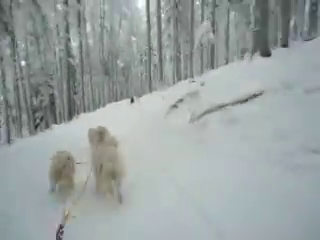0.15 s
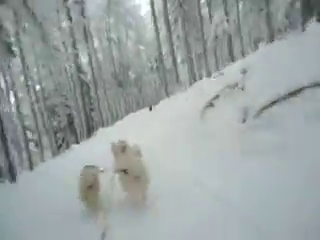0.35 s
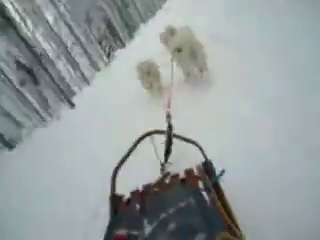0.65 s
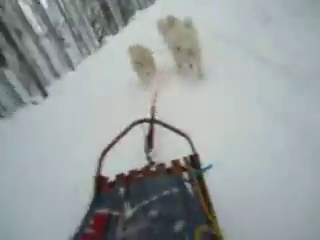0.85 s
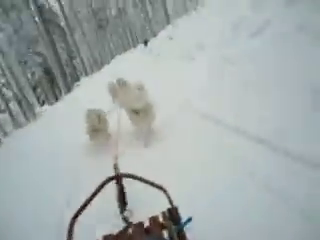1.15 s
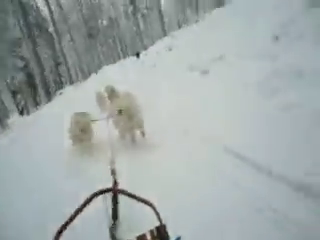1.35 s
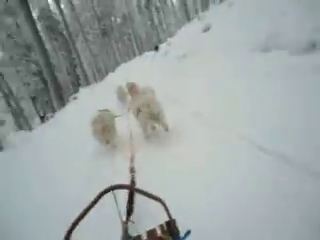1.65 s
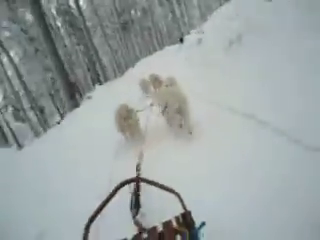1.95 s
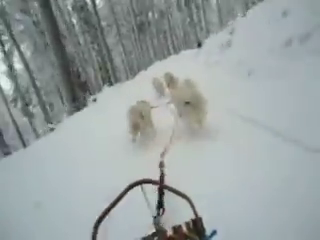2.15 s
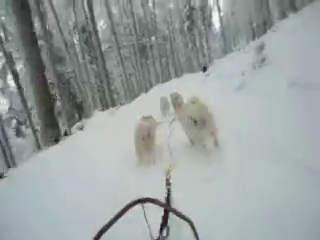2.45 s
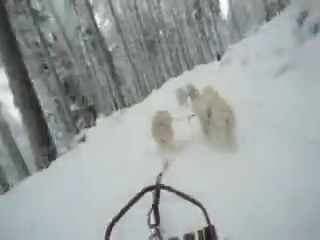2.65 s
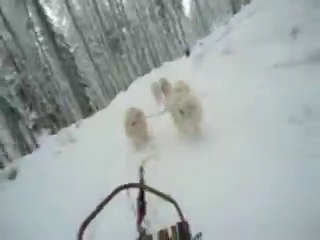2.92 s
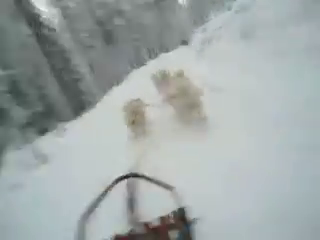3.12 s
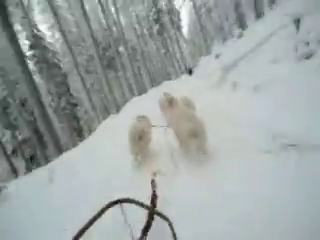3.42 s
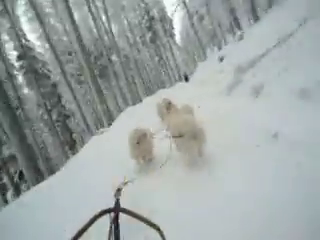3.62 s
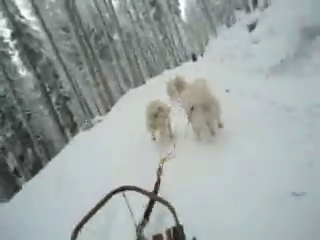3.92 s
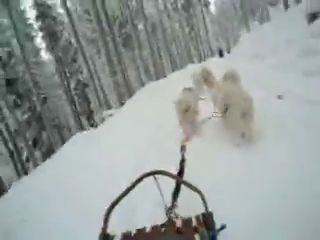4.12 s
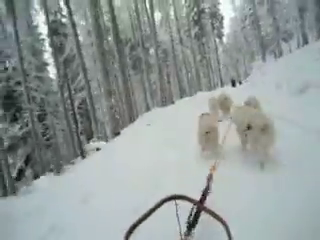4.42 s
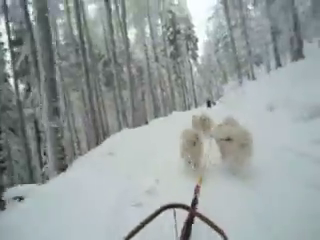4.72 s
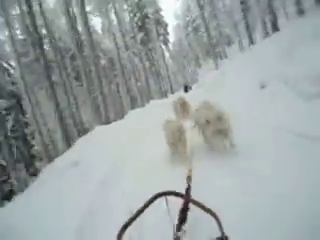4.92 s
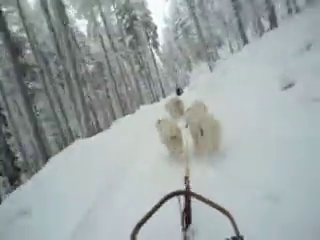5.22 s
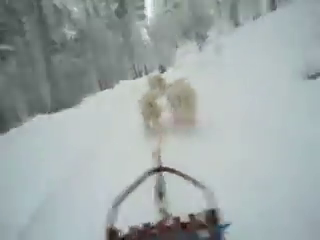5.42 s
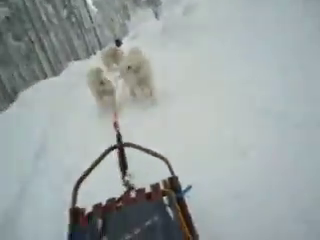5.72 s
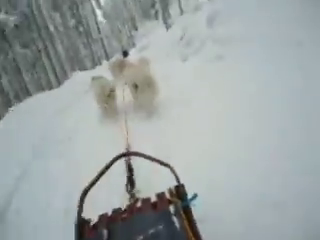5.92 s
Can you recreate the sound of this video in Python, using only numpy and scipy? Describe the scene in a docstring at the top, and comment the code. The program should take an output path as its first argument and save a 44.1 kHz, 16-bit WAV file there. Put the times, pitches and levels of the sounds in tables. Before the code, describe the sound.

Close, overloaded outdoor wind noise dominates, low and rumbling but rough with distortion. It starts choppy, surges heavily from about two seconds, breaks into pops and gaps through the middle, then roars again near five seconds before easing. Bright sliding snow hiss shows through the gaps, with a handful of quick wooden knocks from the sled. The sound is dry, narrow and mono.

```python
"""A harsh, fluttering wind roar, cut by pops and moments of silence, on a dog sled running fast in a snowy forest.
Wind eddies (shaped noise) overload the sled's microphone; long shoves of air pin it silent for moments.
Small vortices pop as pressure flips. The runners hiss on the snow (shaped noise with tiny crunches).
The sled's frame and towline clack (short ringing tones plus noise), and the wind drops briefly around each clack."""
import sys
import numpy as np
from scipy import signal
from scipy.fft import rfft, irfft
from scipy.io import wavfile

SR = 44100
rng = np.random.default_rng(int(sys.argv[2]) if len(sys.argv) > 2 else 0)


def file_out(sig):
    """Save sig as 16-bit WAV at sys.argv[1]."""
    # one column per channel
    cols = np.atleast_2d(sig).T
    # limit, then scale
    lim = np.clip(cols, -1, 1)
    pcm = np.round(lim * 32767).astype(np.int16)
    wavfile.write(sys.argv[1], SR, pcm)


N = 267585
TIME = np.arange(N) / SR  # seconds

# long shoves of air that pin the microphone silent: start/s, length/s, direction (+1 push, -1 suction)
SHOVE_EVENTS = [(.351, .025, -1), (.628, .034, 1), (.694, .037, 1), (.732, .064, -1), (.804, .032, 1),
                (1.031, .027, 1), (1.058, .035, -1), (1.203, .022, -1), (1.252, .089, 1), (1.461, .023, -1),
                (1.538, .023, -1), (1.659, .039, 1), (1.701, .05, -1), (1.758, .038, -1), (1.844, .045, 1),
                (2.013, .022, -1), (2.069, .021, 1), (2.094, .022, -1), (2.375, .025, 1), (2.646, .025, -1),
                (2.749, .037, 1), (2.984, .022, -1), (3.022, .02, 1), (3.061, .033, -1), (3.108, .02, 1),
                (3.221, .022, -1), (3.278, .02, -1), (3.335, .024, -1), (3.371, .064, 1), (3.477, .027, 1),
                (3.542, .043, -1), (3.594, .027, 1), (3.845, .037, 1), (3.94, .034, 1), (4.151, .032, 1),
                (4.199, .02, 1), (4.226, .068, -1), (5.24, .023, -1), (5.372, .02, 1), (5.624, .024, 1),
                (5.737, .035, 1), (5.834, .022, -1)]
# small, sharp vortices that pop on the microphone: middle/s, relative strength/dB
VORTICES = [(.068, 12), (0.343, 13), (0.418, 10), (.452, 12), (.533, 21), (0.581, 17), (0.675, 13),
            (0.751, 11), (1.2, 16), (1.382, 16), (1.455, 19), (1.562, 13.5), (1.798, 13), (1.915, 15),
            (1.955, 13), (2.044, 15), (2.798, 19), (3.093, 12.5), (3.302, 22), (3.508, 23), (3.686, 17),
            (3.709, 17), (4.032, 21), (4.297, 14.5), (5.289, 15), (5.515, 16), (5.544, 25), (5.658, 18.5)]
# clacks of the sled's frame and towline: start/s, relative level/dB, rattle decay time/s
CLACK_EVENTS = [(0.263, 1, 0.0039), (0.287, -10, 0.0067), (2.116, -6.5, 0.029), (3.266, -10.5, 0.015),
                (3.589, -3.5, 0.004), (3.836, -11.5, 0.0022), (3.886, -8.5, 0.0087), (3.934, -9, 0.0042),
                (4.137, -11, 0.0062), (4.219, -4.5, .0038), (5.493, -11, 0.0084), (5.926, -3, .0059)]


def gain_of(db):
    """Turns decibels into an amplitude factor."""
    return 10 ** (np.asarray(db) / 20)


def follow(curve):
    """Reads a control curve at every sample, with straight lines between its points."""
    return np.interp(TIME, *np.transpose(curve))


def coloured(x, points):
    """Filters x by a spectrum drawn on a log-frequency axis."""
    hz, db = np.transpose(points)
    bins = np.fft.rfftfreq(2 * N, 1 / SR)
    bin_db = np.interp(np.log(bins + 1), np.log(hz), db)
    return irfft(rfft(x, 2 * N) * gain_of(bin_db))[:N]


def noise(points):
    """Makes noise of rms 1 with the given spectrum."""
    x = coloured(rng.standard_normal(N), points)
    return x / x.std()


def wander(rate_hz):
    """Makes a smooth random drift of rms 1 by keeping only the slow part of noise."""
    slow_pass = signal.butter(2, rate_hz, fs=SR, output="sos")
    x = signal.sosfilt(slow_pass, rng.standard_normal(N))
    return x / x.std()


def add(mix, s, sound):
    """Mixes a sound in at time s."""
    part = mix[max(round(s * SR), 0):][:len(sound)]
    part += sound[:len(part)]


def airspeed(flutter_db=1.7955, flutter_hz=35, rise_s=.02, fall_s=.015):
    """Strength of the air: each gust rises, holds and falls on top of the steady flow, and all of it flutters."""
    # steady airflow past the microphone, between the gusts: t/s, strength/dB
    airflow = [(0, -7), (.22, -17), (.4, -4), (.75, 3), (1.08, -4), (1.38, -2), (1.52, -11), (1.8, -2),
               (2.1, 0), (2.7, 7), (3.04, -8), (3.3, -3), (3.85, -7), (4.25, -6), (4.8, 5), (5.75, -1),
               (5.88, -12), (6.07, -10)]
    # gusts that roar over it: start/s, length/s, strength/dB
    gusts = [(.88, .1, 18.5), (1.138, 0.043, 5), (1.902, .06, 3), (2.168, .2, 19.5), (2.411, .33, 19.5),
             (2.801, .19, 21), (3.14, .09, 22.5), (3.46, 0.082, 5), (3.654, .08, 6), (4.015, .03, 17),
             (4.301, 0.078, 10), (4.43, 0.079, 12), (4.559, .19, 14.5), (4.79, 0.25, 17.5),
             (5.1, 0.031, 14.5), (5.158, 0.078, 17), (5.289, 0.072, 14.5), (5.41, 0.048, 15.5),
             (5.51, .04, 13)]
    air = gain_of(follow(airflow))
    for start, length, db in gusts:
        edge = np.minimum((TIME - start) / rise_s, (start + length - TIME) / fall_s)
        shape = np.clip(edge + .5, 0, 1) ** 2
        air = air + gain_of(db) * shape
    return air * gain_of(flutter_db * wander(rate_hz=flutter_hz))


def flurries(vortex_s=.003, vortex_db=-2, wake_s=.006, wake_db=1):
    """Extra air strength around each vortex, and in the wake of each shove as it lets go."""
    t, out = TIME[:2000], np.zeros(N)
    from_middle = t - t.mean()
    for s, db in VORTICES:
        bump = np.exp(-(from_middle / vortex_s) ** 2)
        add(out, s - t.mean(), gain_of(db + vortex_db) * bump)
    for start, length, _ in SHOVE_EVENTS:
        add(out, start + length, gain_of(wake_db) * np.exp(-t / wake_s))
    return out


def wind(air, amplitude_db=5.0, buffet_db=-6, buffet_growth=0.31, clump_db=5.5,
         growth=0.57, pace=.8, quickening=.44, surge=0.34):
    """Eddies frozen in the air sweep past: a stronger gust makes them both larger in pressure and quicker."""
    # spectrum of the slow buffeting: f/Hz, relative level per Hz/dB
    buffet_spectrum = [(3, -7), (12, 2), (30, 0.5), (60, -14.5), (150, -23.5), (600, -87.5)]
    # spectrum of the eddies, before the air's pace shifts it: f/Hz, relative level per Hz/dB
    eddy_spectrum = [(8, -4), (25, 0), (60, -6), (110, -7.5), (220, -15), (450, -24), (900, -43),
                     (2500, -78.5)]
    gust = air + flurries()
    # the flow stalls and darts, so fronts arrive in bunches
    clumps = gain_of(clump_db * wander(rate_hz=90))
    # play a fixed stretch of noise at a changing speed, looping at its end
    travelled = pace * np.cumsum((gust * clumps) ** quickening)
    passing = np.interp(travelled % N, np.arange(N), noise(eddy_spectrum))
    eddies = passing * gust ** growth * clumps ** surge
    # slow buffeting leans the microphone against its limit and chops the crackle; in a gust the eddies outgrow it
    buffet = noise(buffet_spectrum) * gain_of(buffet_db) * np.minimum(air ** buffet_growth, air)
    return gain_of(amplitude_db) * (eddies + buffet)


def runners(crunch_db=-3, crusts_per_s=90, crunch_s=.0015):
    """Snow slides under the runners with a bright hiss, and small crusts crunch in it."""
    # hiss of the runners, before the crunches: t/s, level against the overload limit/dB
    glide = [(0, -28.5), (.3, -30), (.7, -20), (1.65, -25.5), (2.1, -22.5), (3.3, -23), (3.75, -26.5),
             (4.15, -18.5), (5.55, -24), (6.07, -23.5)]
    # spectrum of the sliding snow: f/Hz, relative level per Hz/dB
    snow_spectrum = [(100, -5.5), (500, 5.5), (1200, 6), (2200, -1.5), (3600, -4), (5000, -8),
                     (7000, -31.5)]
    crusts = (rng.random(N) < crusts_per_s / SR) * rng.exponential(1, N)
    # each crust breaks at once and dies away
    crunch = signal.lfilter([1], [1, -np.exp(-1 / (crunch_s * SR))], crusts)
    hiss = noise(snow_spectrum) * gain_of(follow(glide))
    return hiss * (1 + gain_of(crunch_db) * crunch)


def pops(level_db=-5, core_s=0.00082):
    """The core of each vortex sucks, flips abruptly to a push, and dies away."""
    t, out = TIME[:800] - TIME[:800].mean(), np.zeros(N)
    for s, db in VORTICES:
        flip = np.sign(t) * np.exp(-abs(t) / core_s)
        add(out, s + t[0], gain_of(db + level_db) * flip)
    return out


def clacks():
    """Each knock rings the frame briefly, with a short rattle of fittings."""
    # ring of the sled's frame, each pitch varied at every knock: f/Hz, level/dB, time to fall by 60 dB/s
    frame_modes = [(1286, 0.5, 0.016), (1758, 6, 0.012), (2905, -16.5, 0.031), (3390, 2, 0.026),
                   (3770, 3, 0.022), (4540, -20, 0.011)]
    t, out = TIME[:3000], np.zeros(N)
    for s, db, rattle_s in CLACK_EVENTS:
        ring = np.zeros(len(t))
        for hz, mode_db, t60 in frame_modes:
            cycles = hz * rng.uniform(0.6, 1.05) * t + rng.random()
            ring += gain_of(mode_db - 60 * t / t60) * np.sin(2 * np.pi * cycles)
        rattle = rng.standard_normal(len(t)) * np.exp(-t / rattle_s)
        add(out, s, gain_of(db) * (.5 * ring + rattle))
    return out


def lulls(depth=0.85, width_s=.014):
    """Gain of the wind: it drops briefly where a clack comes through."""
    near = np.zeros(N)
    for s, _, rattle_s in CLACK_EVENTS:
        near += np.exp(-((TIME - s - rattle_s) / width_s) ** 2)
    return 1 - np.minimum(depth * near, 1)


def shoved(turbulence, air, ramp_s=.0042, pressure=2.02):
    """While a shove lasts, one smooth, strong pressure takes the place of the turbulence."""
    ramp = ramp_s / air ** 0.19  # it grips faster in a gust
    hold, push = np.zeros(N), np.zeros(N)
    for start, length, direction in SHOVE_EVENTS:
        from_edge = np.minimum(TIME - start, start + length - TIME)
        grip = np.clip(from_edge / ramp + 0.532, 0, 1)
        hold += grip
        push += direction * grip
    return turbulence * (1 - np.minimum(hold, 1)) + pressure * push


def scene():
    """Adds up the pressure at the microphone; 1 is its overload limit."""
    air = airspeed()
    turbulence = wind(air) * lulls()
    return (shoved(turbulence, air) + pops() + runners() + clacks())[None]


def low_pass(x, hz, size):
    """Steep low-pass without delay: removes the sound above hz."""
    taps = signal.firwin(size, hz, window=("kaiser", 7), fs=SR)
    return signal.oaconvolve(x, taps, "same")


def record(dry, narrow_hz=5550, edge_hz=16600, output_db=-3.2):
    """The input clips hard and is narrow in band; the ringing of its edges clips once more at the output."""
    # treble colour, flat below the first point: f/Hz, level/dB
    colour = [(5400, -2), (7000, -2), (8500, 0), (10300, 4), (11300, -4.5), (14000, -1), (16000, 1)]
    narrow = low_pass(np.clip(dry[0], -1, 1), narrow_hz, size=161)
    squared = np.clip(narrow, -1.01, 1.01)
    bright = coloured(squared, colour) / gain_of(colour[0][1])  # the bass passes unchanged
    return gain_of(output_db) * low_pass(bright, edge_hz, size=255)[None]


dry = scene()
out = record(dry)
file_out(out)
```